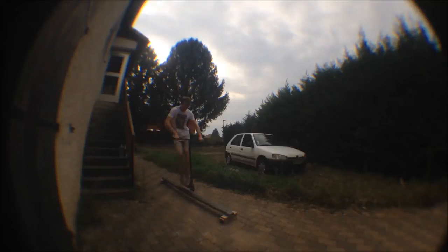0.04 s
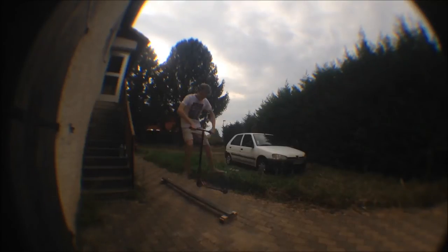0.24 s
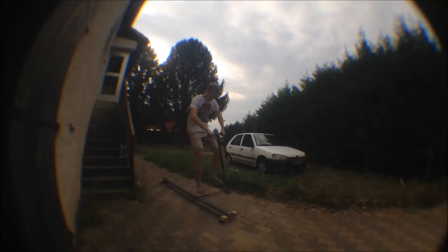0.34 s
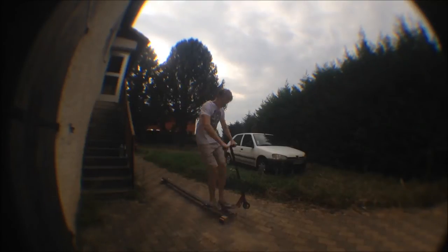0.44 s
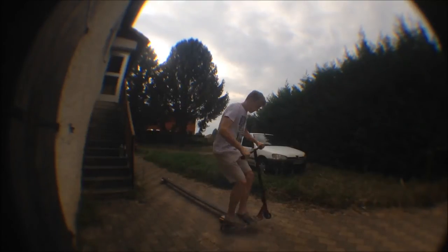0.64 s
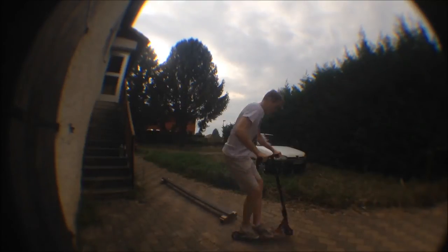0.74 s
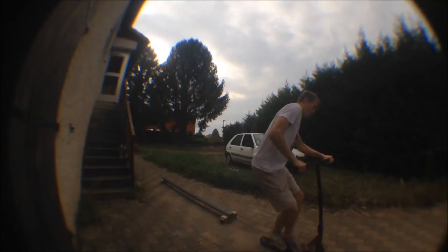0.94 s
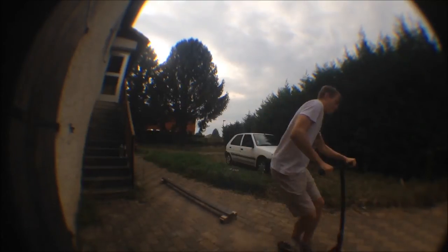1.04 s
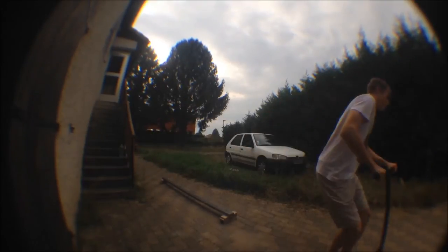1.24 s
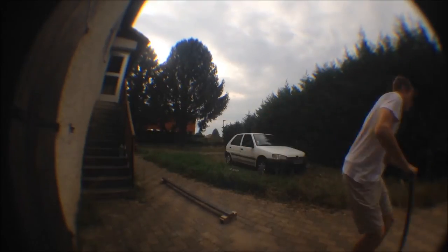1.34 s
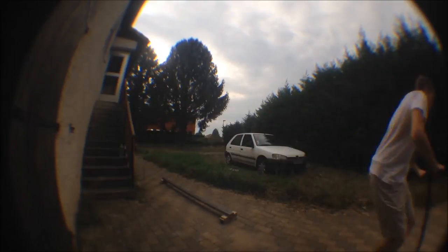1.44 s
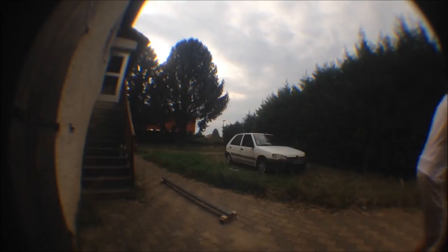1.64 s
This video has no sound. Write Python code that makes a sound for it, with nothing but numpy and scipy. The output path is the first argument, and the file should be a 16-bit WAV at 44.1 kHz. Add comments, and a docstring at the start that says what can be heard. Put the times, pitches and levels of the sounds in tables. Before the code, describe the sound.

A stunt scooter hits a hollow steel rail with a loud clang, clatters and scrapes briefly along it, then lands with a thud and a clack. It rolls over paving, rattling lightly, as the ring fades outdoors.

```python
"""A hollow steel rail clangs as a stunt scooter hops on, clatters along it and drops off.
Each blow cracks, knocks the scooter's deck and sets the rail ringing; tones close in pitch
make the ring pulse slowly. The deck scrapes briefly along the steel. The wheels land with
a thud and a metallic clack, then roll over the joints of the paving while loose parts
rattle. The yard adds two quick echoes and a faint tail."""
import sys
import numpy as np
from scipy import signal
from scipy.fft import rfft, irfft
from scipy.io import wavfile
from scipy.ndimage import uniform_filter1d

SR = 44100
rng = np.random.default_rng(int(sys.argv[2]) if len(sys.argv) > 2 else 0)


def put_to_file(sound):
    """Save the sound as 16-bit audio at rate SR, in the file named by the first command-line argument."""
    columns = np.atleast_2d(sound).T  # one column per channel
    safe = np.clip(columns, -1, 1)
    whole_steps = np.round(safe * 32767)
    wavfile.write(sys.argv[1], SR, whole_steps.astype(np.int16))


N = 74970

# A fade_s is the time to die away by 60 dB. A COLOUR says how strong each pitch is next to the rest.
# echoes from the house wall and steps: delay_s, level_db
ECHOES = [(.017, -15.5), (.033, -27.5)]
# the yard's tail: pitch_hz, fade_s
YARD_FADE = [(100, 0.2), (1000, 1), (3000, 0.5), (6000, 0.72), (12000, 0.83)]
# wheels rolling on paving: pitch_hz, level_db
ROLL_COLOUR = [(15, -33), (28, -7), (53, 5), (90, -6.5), (132, -2), (204, -15), (340, -10.5), (522, -11),
               (721, -21), (1140, -24), (2000, -30), (4140, -32), (5720, -39.5), (9000, -50.5),
               (15500, -54)]
# loudness of the rolling: time_s, level_db
ROLL_LEVEL = [(0, -50.5), (.5, -68.5), (.65, -45), (0.899, -44.5), (1.3, -46.5), (1.7, -46)]
# ticking grit and bearings: pitch_hz, level_db
GRIT_COLOUR = [(300, 12), (1500, -3), (2700, -3), (4300, -0.5), (5500, -20), (9000, -19), (15000, -28)]
# wheels landing and crossing joints: start_s, thud_db, clop_db
BUMPS = [(0.461, -35.5, -37), (0.561, -30.5, -32), (0.5728, -23.5, -39), (0.693, -40.5, -37),
         (.822, -44, -33), (0.889, -34.5, -43), (0.943, -37.5, -34.5), (1.069, -51, -39.5),
         (1.151, -34, -43.5), (1.222, -35, -42), (1.272, -51, -55), (1.336, -33, -40.5), (1.46, -39, -38),
         (1.573, -30.5, -50.5), (1.684, -28.5, -47)]
# low tones of the loaded wheels: pitch_hz, level_db, fade_s
THUD_TONES = [(63.6, -6, .13), (105.8, 3.5, 0.087), (126.8, -2.5, 0.16), (300, -13, 0.017)]
# the clop of a wheel at a bump: pitch_hz, level_db
CLOP_COLOUR = [(70, -3.5), (200, -13.5), (310, 0), (520, -19), (800, -22.5), (2000, -30.5), (8000, -47.5)]
# how the clop dies away: pitch_hz, fade_s
CLOP_FADE = [(200, 0.15), (2000, 0.042)]
# clacks and rattles of the scooter: start_s, click_db, ring_db, treble_db
CLACKS = [(0.1407, -34.5, -42, -9), (0.1506, -34, -25, 0.5), (0.1876, -36, -18, -6),
          (0.568, -33.5, -7.5, 1), (0.5791, -28, -8.5, 8), (0.581, -40, 1.5, 10), (.686, -46.5, -35, 5),
          (0.758, -55, -21.5, -10), (0.8611, -45, -17.5, -3), (0.9, -48, -31, -9),
          (0.943, -45.5, -19.5, -14), (1.075, -54, -28, -1), (1.102, -44, -19.5, -16),
          (1.27, -65, -29, -13), (1.3248, -50.5, -20, -3), (1.4709, -50.5, -31, -1.5),
          (1.5746, -54, -29.5, 5)]
# tones of the fork and bar: pitch_hz, level_db, fade_s
FORK_TONES = [(2671, -31, 0.08), (3330, -35.5, 0.036), (3660, -28, 0.093), (3747, -44.5, .3),
              (4158, -27.5, 0.043), (4270, -35, 0.1), (5240, -42.5, 0.075), (6200, -53, 0.22),
              (6860, -51, 0.08), (10900, -59, .08)]
# the click of a loose part: pitch_hz, level_db
CLICK_COLOUR = [(200, 3.5), (700, 5), (2200, 6), (4200, 2), (6500, -5), (9000, -18.5), (12000, -32.5),
                (15000, -25.5)]
# how the click dies away: pitch_hz, fade_s
CLICK_FADE = [(500, 0.11), (4000, 0.05), (12000, 0.078)]
# slides along the rail: start_s, rise_s, level_db, fade_s
SLIDES = [(.222, 0.035, -23.5, 0.17), (.35, 0.018, -22, 0.23)]
# the deck scraping on steel: pitch_hz, level_db
SCRAPE_COLOUR = [(300, -9.5), (1200, 9.5), (3200, -3), (5200, 2), (7000, -7.5), (9200, -17), (11000, -36),
                 (15000, -37)]
# blows on the rail: start_s, crack_db, clang_db, knock_db, ring_db
BLOWS = [(-.03, -41, -28.5, -48.5, -16.5), (.2098, -6, -18.5, -23.5, -6), (.2128, -15, -34, -41, -21.5),
         (.228, -12, -14, -27.5, -7.5), (.2425, -17, -14.5, -28.5, -4), (.2485, -13, -24, -40, -21.5),
         (.2665, -12.5, -24.5, -16.5, -18.5), (.341, -19.5, -30.5, -18, -26),
         (.3555, -13, -27.5, -17.5, -25.5), (.386, -19, -17, -20, -3), (.426, -38, -23.5, -31, -27),
         (.4615, -25.5, -42, -40.5, -44)]
# tones of the rail: pitch_hz, level_db, fade_s
RAIL_TONES = [(904, -38.5, 1.1), (972, -28, 1.86), (987, -38.5, 1.9), (999.6, -28.5, 1.37),
              (1024, -26.5, 0.4), (1280, -30, 0.91), (1236, -34, 0.79), (1282, -18, 0.49), (1309, -25, .76),
              (1626, -32.5, 0.8), (1746, -46, 1.7), (2739, -36.5, 2.31), (3013, -42, 2.0),
              (3643, -42.5, 1.25)]
# tones of the deck and frame: pitch_hz, level_db, fade_s
DECK_TONES = [(406.5, -17, 0.38), (508.5, -6, 0.23), (734.7, -12, 0.66), (960, -5.5, 0.45),
              (1048, -6.5, 0.35), (1094, 4.5, 0.15), (1165, -7, 0.1), (1638, -2, 0.15), (1714, -8, 0.22),
              (1761, -34, 0.14), (2825, -21, 0.51), (3035, -15, 0.12), (4110, -9.5, 0.098),
              (4128, -13.5, 0.11)]
# the rail's many faint high tones, which last longest: pitch_hz, level_db
SHIMMER_COLOUR = [(1200, -20.5), (1700, -12.5), (2100, -14.5), (2700, -2.5), (3100, -2.5), (3800, -9),
                  (4400, -1), (5200, -16.5), (8000, -49.5)]
# how the shimmer dies away: pitch_hz, fade_s
SHIMMER_FADE = [(1700, 2.33), (2800, 2.95), (4500, 1.1)]
# the crack of metal on metal: pitch_hz, level_db
CRACK_COLOUR = [(150, -24.5), (600, -26), (1200, 14), (2000, 3.5), (3000, 6.5), (4300, 0), (6000, -11.5),
                (8000, -35), (11000, -51), (15000, -56)]
# how the crack dies away: pitch_hz, fade_s
CRACK_FADE = [(300, 0.038), (3000, 0.07), (12000, 0.14)]
# the hard snap of first contact: pitch_hz, level_db
SNAP_COLOUR = [(300, -10), (1500, -8.5), (3000, 6.5), (5000, -3), (8000, -18), (11000, -32.5), (15000, -43)]
# how the snap dies away: pitch_hz, fade_s
SNAP_FADE = [(500, 0.0098), (12000, 0.0074)]
# crowded overtones of rail and deck together: pitch_hz, level_db
CLANG_COLOUR = [(100, -41), (350, -19.5), (800, -9), (1000, 2.5), (1300, 2.5), (1450, -6.5), (1700, -9.5),
                (2100, -20), (2800, -19.5), (4300, -28), (6000, -37), (10000, -63), (15000, -62)]
# how the clang dies away: pitch_hz, fade_s
CLANG_FADE = [(200, 0.32), (700, 0.32), (1200, 0.38), (2000, 0.44), (3000, 0.51), (5200, 0.44),
              (7500, 0.17), (12000, .3)]
# the deck knocking under the rider's weight: pitch_hz, level_db
KNOCK_COLOUR = [(60, -24), (140, -23.5), (195, -8.5), (280, -21), (380, -3), (510, -2.5), (600, 1.5),
                (700, -0.5), (1000, -10.5), (2000, -20.5), (8000, -72.5)]
# how the knock dies away: pitch_hz, fade_s
KNOCK_FADE = [(150, 0.22), (500, 0.15), (2000, 0.05)]


def gain(db):
    """Turns decibels into a number to multiply by."""
    return 10 ** (np.asarray(db) / 20)


def unit_level(x):
    """Scales a signal to an average (rms) level of 1."""
    return x / np.sqrt(np.mean(x ** 2) + 1e-20)


def look_up(table, hz):
    """Reads between a table's rows, with every octave equally wide."""
    pitches, values = np.transpose(table)
    return np.interp(np.log(hz + 1), np.log(pitches), values)


def add(mix, start_s, sound):
    """Mixes a sound in, dropping any part that falls outside the mix."""
    at = round(start_s * SR)
    sound = sound[max(-at, 0):]
    part = mix[max(at, 0):][:len(sound)]
    part += sound[:len(part)]


def fade(t, fade_s):
    """Falls by 60 dB every fade_s seconds."""
    return np.exp(-np.log(1000) * t / fade_s)


def soften(x, rise_s):
    """Softens the start of a sound."""
    return x * (1 - np.exp(-np.arange(len(x)) / SR / rise_s))


def coloured(x, colour):
    """Makes some pitches stronger than others, then sets the level to 1."""
    hz = np.fft.rfftfreq(len(x), 1 / SR)
    return unit_level(irfft(rfft(x) * gain(look_up(colour, hz)), len(x)))


def burst(colour, fades, size=32768, peaks=1):
    """Countless tones struck at once, each band of pitches dying at its own speed."""
    hz, t = np.fft.rfftfreq(size, 1 / SR), np.arange(size) / SR
    spectrum = peaks * gain(look_up(colour, hz)) * np.exp(2j * np.pi * rng.random(len(hz)))
    centres, fades_s = np.transpose(fades)
    bands = [irfft(spectrum * look_up(np.c_[centres, one_band], hz)) for one_band in np.eye(len(centres))]
    return sum(band * fade(t, fade_s) for band, fade_s in zip(bands, fades_s)) / np.std(sum(bands))


def ring(tones, uneven_db):
    """Clear tones, each a little stronger or weaker by chance, as if struck in a new spot."""
    t = np.arange(SR // 2) / SR
    offsets_db = uneven_db * rng.standard_normal(len(tones))
    return sum(gain(db + offset_db) * fade(t, fade_s) * np.sin(2 * np.pi * hz * t)
               for (hz, db, fade_s), offset_db in zip(tones, offsets_db))


def ticks(per_s, spread_db=1):
    """A random train of tiny clicks of uneven size."""
    clicks = (rng.random(N) < per_s / SR) * rng.choice([-1, 1], N)
    return clicks * gain(spread_db * np.minimum(rng.exponential(1, N), 4))


def waver(fastest_hz):
    """A smooth random wobble made of twelve slow waves."""
    t = np.linspace(0, N / SR, 256)
    speed, phase = rng.random((2, 12, 1))
    wobble = np.sin(2 * np.pi * (fastest_hz * speed * t + phase)).sum(0)
    return np.interp(np.arange(N) / SR, t, unit_level(wobble))


def yard(sound, tail_db=-22):
    """The wall and steps throw back two echoes, and a faint open-air tail follows."""
    tail = soften(burst([(100, 3), (15000, 0.5)], YARD_FADE), rise_s=0.022)
    response = gain(tail_db) * tail / np.linalg.norm(tail)
    for delay_s, db in ECHOES:
        add(response, delay_s, gain([db]))
    return sound + signal.fftconvolve(sound, response)[:N]


def wheels(grit_db=-59):
    """Hard wheels rumble over gritty paving and thud as they land or cross a joint."""
    level = gain(np.interp(np.arange(N) / SR, *np.transpose(ROLL_LEVEL)))
    grit = gain(grit_db) * coloured(ticks(per_s=380), GRIT_COLOUR)
    rumble = coloured(rng.standard_normal(N), ROLL_COLOUR)
    out = level * rumble + level / level.max() * grit
    for start_s, thud_db, clop_db in BUMPS:
        add(out, start_s, gain(thud_db) * soften(ring(THUD_TONES, uneven_db=1.0), 0.0059))
        add(out, start_s, gain(clop_db) * soften(burst(CLOP_COLOUR, CLOP_FADE, size=8192), 0.0016))
    return out


def loose_parts():
    """Loose parts click, some duller than others, and make the fork and bar ring."""
    out = np.zeros(N)
    for start_s, click_db, ring_db, treble_db in CLACKS:
        tilt = [(3000, 0), (10000, treble_db)]
        colour = [(hz, db + look_up(tilt, hz)) for hz, db in CLICK_COLOUR]
        add(out, start_s, gain(click_db) * soften(burst(colour, CLICK_FADE, size=8192), 0.00035))
        add(out, start_s, gain(ring_db) * soften(ring(FORK_TONES, uneven_db=3.0), 0.0004))
    return out


def deck_scrapes():
    """The deck scrapes along the steel in quick tiny slips."""
    out, t = np.zeros(N), np.arange(N) / SR
    for start_s, rise_s, db, fade_s in SLIDES:
        swell = np.minimum(t / rise_s, 1) * fade(np.maximum(t - rise_s, 0), fade_s)
        add(out, start_s, gain(db) * swell * coloured(ticks(per_s=3500), SCRAPE_COLOUR))
    return out


def overtones(per_khz=32.4, between_db=-8, size=32768):
    """Picks random high pitches that stand out from the rest of the clang."""
    hz = np.fft.rfftfreq(size, 1 / SR)
    chance = per_khz * hz[1] / 1000
    peaks = (rng.random(len(hz)) < chance) / np.sqrt(chance)
    return np.where(hz > 1800, peaks + gain(between_db), 1)


def ringing_metal(tones, starts_s, levels_db, waver_db=1.8):
    """Tones gather energy from blow after blow and waver as they die away."""
    t, out = np.arange(N) / SR + starts_s[0], np.zeros(N)
    lead_in = max(-round(starts_s[0] * SR), 0)  # room for a blow before time zero
    kicks = np.zeros(N + lead_in)
    for start_s, db in zip(starts_s, levels_db):
        kicks[round(start_s * SR) + lead_in] += gain(db) ** 2
    for hz, db, fade_s in tones:
        kept_per_sample = fade(1 / SR, fade_s) ** 2
        energy = signal.lfilter([1], [1, -kept_per_sample], kicks)
        strength = uniform_filter1d(np.sqrt(energy), size=60)[lead_in:]
        out += gain(db + waver_db * waver(fastest_hz=11.68)) * strength * np.sin(2 * np.pi * hz * t)
    return out


def rail_blows(deck_db=-7, shimmer_db=-37):
    """Each blow cracks, knocks the deck and sets the frame and the hollow rail ringing."""
    starts_s, cracks_db, clangs_db, _, rings_db = np.transpose(BLOWS)
    out = ringing_metal(RAIL_TONES, starts_s, rings_db)
    out += gain(deck_db) * ringing_metal(DECK_TONES, starts_s, clangs_db)
    peaks = overtones()  # the same for every blow
    hardest_s = starts_s[np.argmax(cracks_db)]
    add(out, hardest_s, gain(shimmer_db) * burst(SHIMMER_COLOUR, SHIMMER_FADE, size=65536))
    for start_s, crack_db, clang_db, knock_db, _ in BLOWS:
        add(out, start_s, gain(crack_db) * soften(burst(CRACK_COLOUR, CRACK_FADE, size=8192), 0.00023))
        add(out, start_s, gain(crack_db) * soften(burst(SNAP_COLOUR, SNAP_FADE, size=2048), 0.00019))
        add(out, start_s, gain(clang_db) * soften(burst(CLANG_COLOUR, CLANG_FADE, peaks=peaks), 0.0011))
        add(out, start_s, gain(knock_db) * soften(burst(KNOCK_COLOUR, KNOCK_FADE, size=16384), 0.0017))
    return out


def scene():
    """Rail and scooter sound together in the yard, on one channel."""
    return yard(rail_blows() + deck_scrapes() + loose_parts() + wheels())[None]


def record(dry, low_cut_hz=58, ceiling=0.94, high_cut_hz=15300):
    """The microphone drops the deepest bass and rounds off loud peaks; then the top treble is cut."""
    thinned = signal.sosfilt(signal.butter(2, low_cut_hz, "high", fs=SR, output="sos"), dry)
    rounded = thinned / (1 + (thinned / ceiling) ** 4) ** (1 / 4)
    treble_cut = signal.firwin(511, high_cut_hz, window=("kaiser", 9), fs=SR)
    return signal.oaconvolve(rounded, treble_cut[None], "same")


dry = scene()
out = record(dry)
put_to_file(out)
```